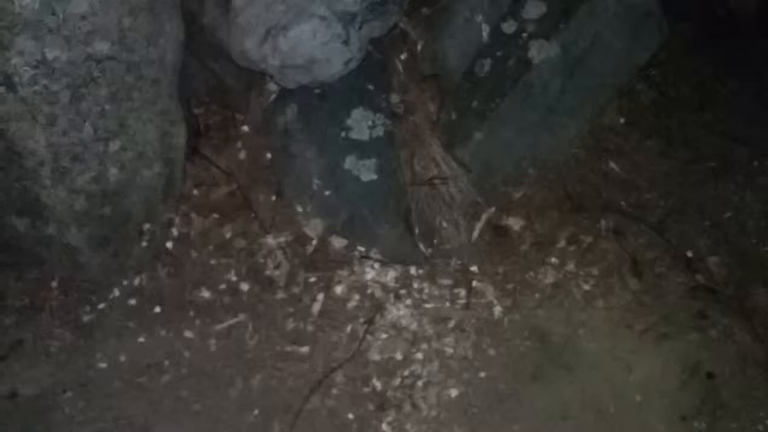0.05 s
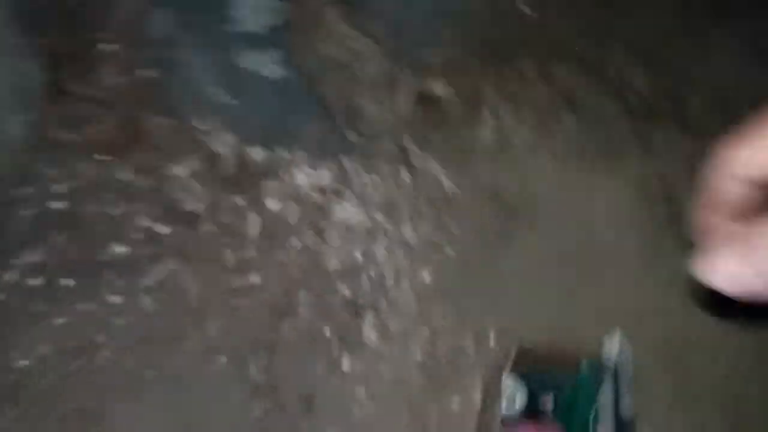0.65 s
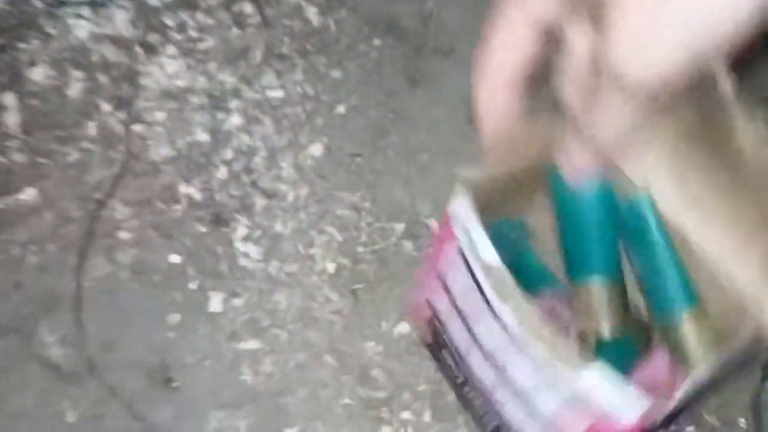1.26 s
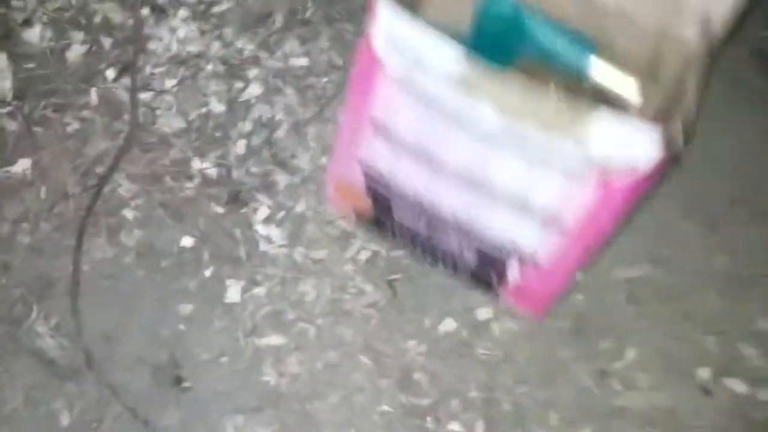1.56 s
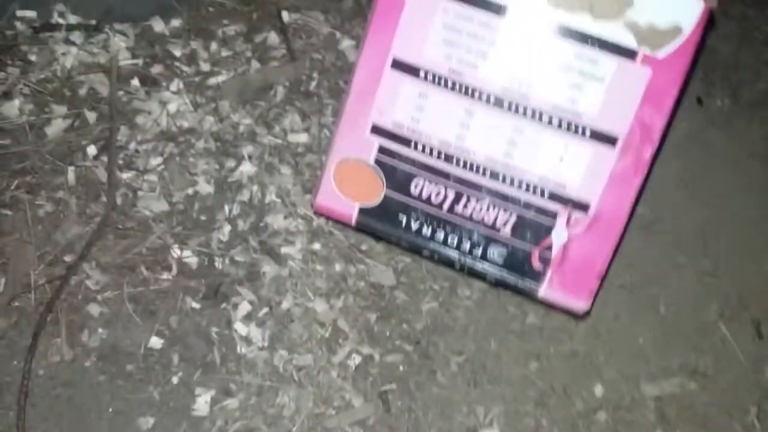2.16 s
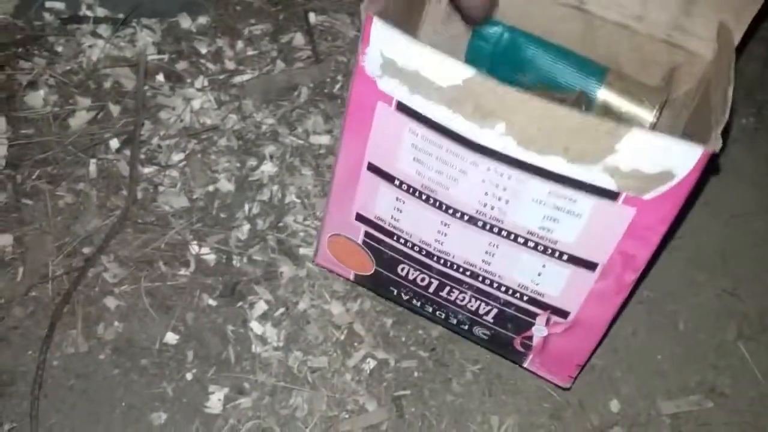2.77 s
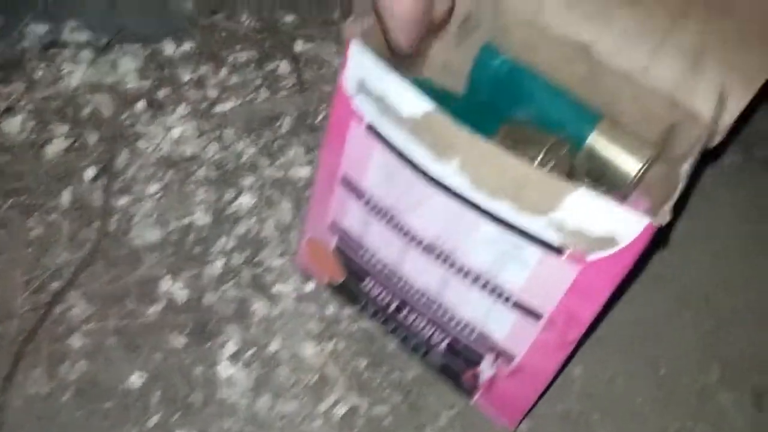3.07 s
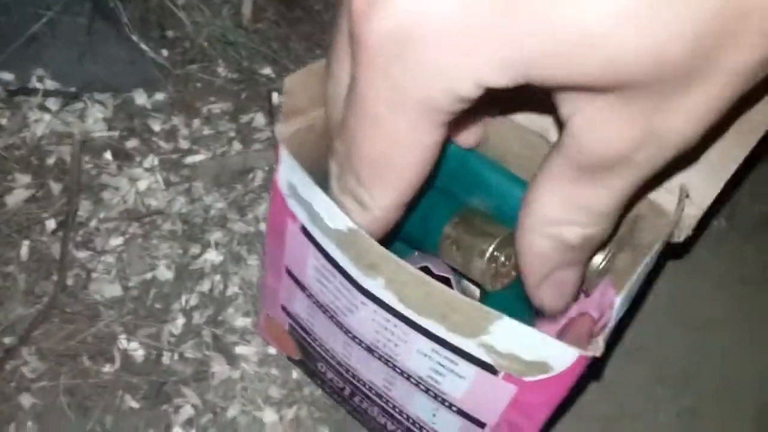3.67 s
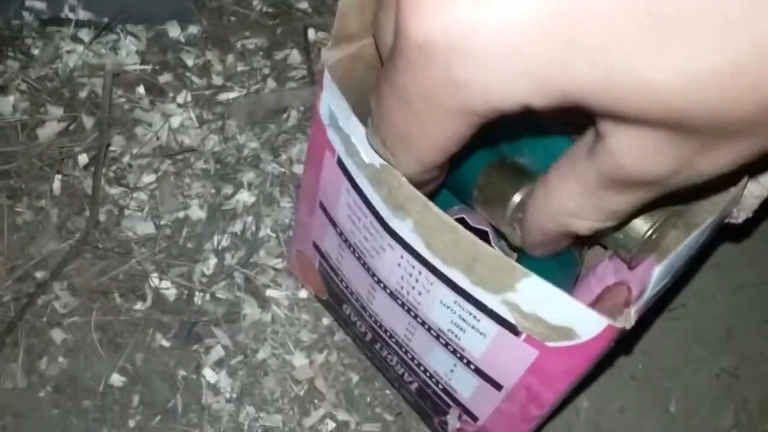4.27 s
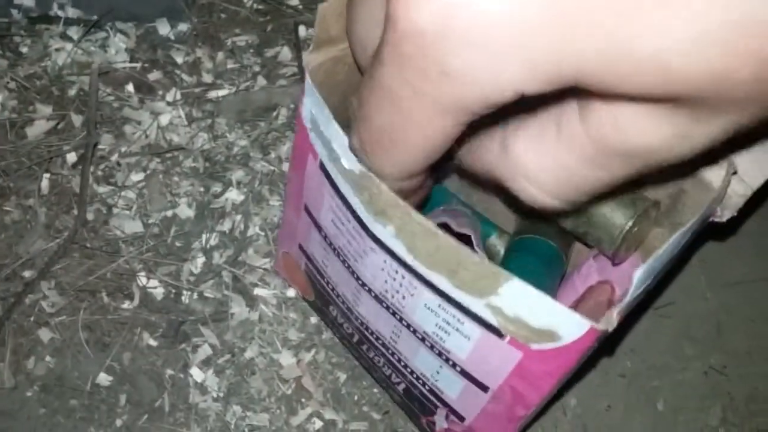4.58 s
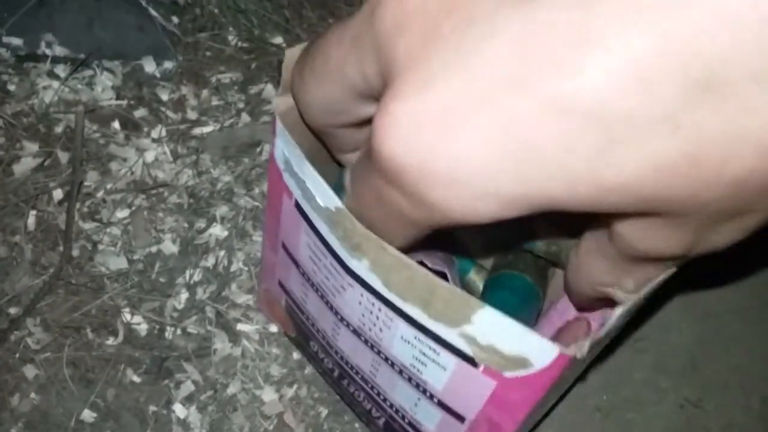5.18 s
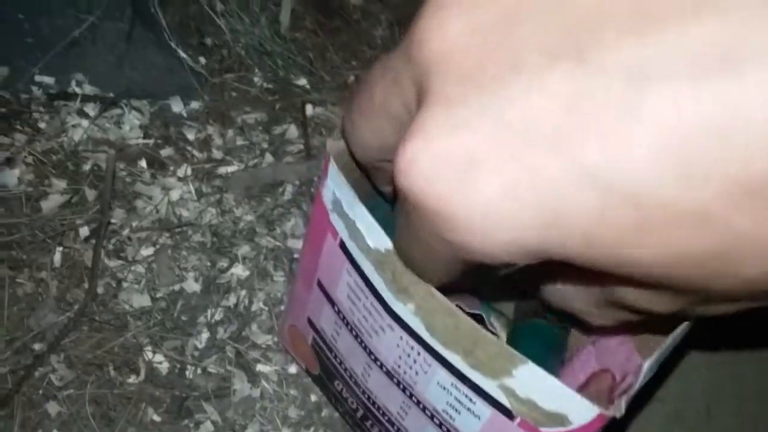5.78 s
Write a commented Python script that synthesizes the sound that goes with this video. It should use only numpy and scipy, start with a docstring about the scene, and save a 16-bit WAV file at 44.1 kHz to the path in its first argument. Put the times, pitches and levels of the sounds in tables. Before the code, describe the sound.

A cardboard box scrapes across dry ground, then fingers dig through the shotgun shells inside with scattered clicks, soft thuds and rubs.

```python
"""Rummaging in a box of shells

A hand drags a small cardboard box of shotgun shells over dry ground and digs through it, outdoors
on a still night. Loaded plastic hulls clack together, their brass heads tick, the box thuds under them.
Between the blows, hulls and fingers scrape the cardboard. A faint hiss and low air lie underneath."""
import sys
import numpy as np
from scipy import signal
from scipy.fft import rfft, irfft, next_fast_len
from scipy.io import wavfile
from scipy.ndimage import uniform_filter1d

SR = 44100
rng = np.random.default_rng(int(sys.argv[2]) if len(sys.argv) > 2 else 0)


def generate_wav(sig):
    """Save sig (samples, or channels by samples) to the path in sys.argv[1] as 16-bit PCM at SR."""
    pcm = np.round(np.clip(np.atleast_2d(sig).T, -1, 1) * 32767).astype(np.int16)
    wavfile.write(sys.argv[1], SR, pcm)


N = 266364
TIME = np.arange(N) / SR
AGE = TIME[:SR // 5]   # seconds into one blow

# Cue levels are faders: each layer adds its own trim.
# shell hits shell: start_s, level_db, pitch_hz, hardness_db, ring_share
# (hardness is high when brass meets brass; ring share scales the decay, below 1 for a wedged shell)
CLACKS = [(0.987, -73, 1500, 16, .5), (1.226, -54.5, 1080, 3.5, .35), (1.26, -47, 1680, 5, 0.96),
          (1.29, -41, 1550, -12, 0.64), (1.463, -37.5, 1100, 2, 0.83), (1.4925, -25, 1170, -7, 1),
          (1.505, -29, 1100, -15, 0.56), (1.519, -29, 940, -5.5, 0.88), (1.525, -25.5, 1250, -2.5, 0.31),
          (1.533, -26.5, 880, -8, 1), (1.573, -42.5, 1100, -4.5, .8), (1.588, -39.5, 1000, -10, 0.78),
          (1.88, -37.5, 800, -19, 0.53), (1.902, -56, 950, 3.5, 0.42), (2.447, -68, 1100, 5, 0.66),
          (2.996, -39.5, 1180, -11.5, 0.54), (3.109, -53, 1510, -1, 0.28), (3.118, -56, 1660, -8, 0.65),
          (3.514, -43.5, 1100, -17, 1), (3.956, -29.5, 1056, -7.5, 0.43), (4.15, -53, 1100, 1, .4),
          (4.155, -40.5, 1020, -12.5, 0.52), (4.506, -52, 1420, -8, 1), (4.5922, -40.5, 1670, -12, 0.6),
          (4.678, -55, 1160, -3.5, 0.83), (4.773, -45.5, 1720, -3, 0.97), (4.802, -50.5, 1850, -22, 0.53),
          (4.955, -49.5, 1250, -14, 0.37), (5.5175, -33, 1260, -6, 0.47), (5.6881, -18.5, 1340, -8, 0.95),
          (5.695, -21.5, 1300, -25, .95), (5.761, -42.5, 1110, -1, 0.65), (5.767, -34.5, 1100, -10, 0.64),
          (5.789, -37.5, 1120, -10.5, 1), (5.934, -42, 2000, -18, .5), (6.019, -48, 1440, -9.5, .95)]
# shell bumps the box wall: start_s, level_db, pitch_hz, hardness_db
THUDS = [(1.183, -57, 465, -9), (1.279, -40.5, 324, -0.5), (1.333, -33, 586, -5), (1.469, -29, 487, -21),
         (1.505, -37, 330, -12), (1.526, -28, 276, -13.5), (1.88, -37, 760, -11.5), (2.039, -53, 310, -17),
         (2.079, -60.5, 350, -13), (2.757, -57.5, 280, -7), (2.884, -51.5, 268, -22),
         (2.952, -32.5, 320, -16.5), (3.047, -56.5, 650, -4), (3.118, -52.5, 310, -11),
         (3.514, -40, 430, -19), (3.53, -46.5, 347, -16), (3.835, -58.5, 380, -8),
         (3.884, -48.5, 333, -5.5), (3.955, -41, 600, -16), (4.094, -57, 410, -7), (4.556, -56, 430, -6.5),
         (4.593, -47.5, 440, -12), (4.607, -46.5, 435, -9), (4.955, -47, 450, -15),
         (4.987, -51.5, 270, -3.5), (5.77, -41, 610, -18), (5.96, -53, 565, -9)]
# hulls and fingers rub the cardboard: middle_s, level_db, grit_offset_db, half_length_s
RUBS = [(1.275, -54, -7, 0.023), (1.409, -46.5, 6, 0.021), (1.578, -49, -2, 0.019), (1.681, -53, -1, 0.027),
        (1.874, -52.5, -6, 0.032), (2.894, -66, 4, 0.017), (2.969, -48, -7.5, 0.017), (3, -52, -6.5, 0.036),
        (3.396, -62.5, 3.5, 0.0074), (3.513, -54.5, -5.5, 0.041), (3.707, -62, -1.5, 0.024),
        (3.924, -56.5, -5.5, 0.056), (3.967, -54, 1, 0.014), (4.501, -64, -3.5, 0.022),
        (4.703, -57, -5, 0.013), (4.774, -56, 4, 0.027), (4.993, -62, 2, 0.025), (5.4, -66.5, -5, 0.071),
        (5.487, -59.5, -12, 0.016), (6.024, -62.5, 0.5, 0.041)]
# effort of pulling the box over the ground: time_s, level_db
DRAG_CURVE = [(1.2, -76), (1.27, -55), (1.36, -56), (1.44, -45), (1.56, -49), (1.71, -54.5), (1.79, -60),
              (1.95, -68.5)]
# the hand stirs the shells: time_s, chafe_db, rasp_db
STIR_CURVE = [(3.3, -82, -86), (3.65, -71, -83), (4.0, -80.5, -73), (4.35, -70, -82), (5.1, -78, -93),
              (5.42, -64, -76), (6.04, -65, -93)]
# plastic squeaks on plastic: middle_s, level_db, pitch_hz, half_length_s
SQUEAKS = [(1.974, -54.5, 2920, .002), (3.386, -49.5, 14400, .005), (5.567, -57, 13100, .0026)]
# rise and fall of the hiss: time_s, level_db
HISS_CURVE = [(0.4, -70.5), (0.86, -61), (1.0, -67), (1.08, -73.5), (3.1, -76), (4.0, -74), (6.04, -72.5)]

# modes of a loaded shell among its neighbours: pitch_hz, level_db, t60_s
SHELL_MODES = [(878, -2.5, 0.052), (965, 0, 0.04), (1080, 2, 0.073), (1193, -3.5, 0.06),
               (1439, -3.5, 0.073), (1528, 0, 0.038), (1681, -4, 0.052), (1757, -3.5, 0.05),
               (1911, -4, 0.058)]
# higher modes of the hull and its brass head: pitch_hz, level_db, t60_s
BRASS_MODES = [(2239, -2, 0.038), (2523, -0.5, 0.044), (3077, -2.5, 0.061), (3116, -6, 0.056),
               (3423, -11, 0.061), (3510, -18, 0.022), (4030, 0.5, 0.053), (4640, -6, 0.03)]
# modes of the cardboard box: pitch_hz, level_db, t60_s
BOX_MODES = [(226, -14.5, 0.25), (246.7, -1, 0.094), (312.4, -1, 0.087), (338, -3.5, 0.084),
             (411.6, -9.5, 0.067), (477.7, -9.5, 0.096), (565, -7.5, 0.065), (653, -1, 0.052)]

# bright tick of a blow: frequency_hz, level_db
TICK_EQ = [(2500, -14), (4200, 2.5), (5800, -1), (8500, -6.5), (11500, -6), (16000, -18.5)]
# dull body of rubbed cardboard: frequency_hz, level_db
RUB_EQ = [(59, -41), (100, -7.5), (161, -6), (235, -7.5), (328, -5), (472, -4), (698, -4.5), (784, -17),
          (906, -9), (1420, -13), (1570, -7), (2390, -18), (3200, -22.5), (4160, -51), (7040, -120)]
# rasp of its fibres: frequency_hz, level_db
GRIT_EQ = [(1470, -1), (2500, -4.5), (3210, -4.5), (4580, -2.5), (7420, -10.5), (9510, -8), (16000, -15)]
# low night air: frequency_hz, level_db
AIR_EQ = [(25, -16), (45, -3.5), (100, 0), (300, -1.5), (600, -7), (2500, -15.5)]
# smooth hiss: frequency_hz, level_db
HISS_EQ = [(1900, -8.5), (2400, -11), (3200, -10.5), (4400, -6), (6000, -10.5), (12000, -9.5),
           (16000, -11.5)]


def knocks():
    """Each glancing blow rings shell, box and brass, with a tick on top and a short skid in and out."""
    hits, skid_rub, skid_grit = np.zeros((3, N))
    bright = coloured(noise(), TICK_EQ)
    middle_s = AGE[-1] / 2
    skid = swell(middle_s + 0.0027, 0.0075)[:len(AGE)]   # peaks just after the hit
    blows = [clack(*row) for row in CLACKS] + [thud(*row) for row in THUDS]
    for k, (start_s, shell_db, shell_hz, box_db, box_hz, brass_db, share, softness) in enumerate(blows):
        pinch = np.clip(1 - share, 0, 1)   # wedged shells ring shorter and off pitch
        shell = from_db(shell_db - 3) * ring(
            SHELL_MODES, share, shell_hz, focus_db=21, contact_s=0.00064 * softness, detune=.05 * pinch)
        box = from_db(box_db - 4.5) * ring(
            BOX_MODES, share, box_hz, focus_db=23.5, contact_s=0.0009 * softness, detune=.08 * pinch)
        brass = from_db(brass_db - 6) * ring(
            BRASS_MODES, share * 1.02, 3370, focus_db=-8, contact_s=0.00059 * softness, detune=.3 * pinch)
        fizz = np.roll(bright, k * len(AGE) // 2)[:len(AGE)]
        add(hits, start_s, shell + box + brass + from_db(brass_db - 7) * tick(fizz, share, softness))
        add(skid_rub, start_s - middle_s, from_db(box_db - 7) * skid)
        add(skid_grit, start_s - middle_s, from_db(brass_db - 11.5) * skid)
    return hits + friction(skid_rub, skid_grit)


def clack(start_s, level_db, pitch_hz, hardness_db, ring_share):
    """Shell on shell: the hull leads and the box carries a little of the blow."""
    typical_db, box_hz, softness = -38, 464, 1
    box_db = -48 + 0.63 * (level_db - typical_db)
    return start_s, level_db, pitch_hz, box_db, box_hz, level_db + hardness_db, ring_share, softness


def thud(start_s, level_db, pitch_hz, hardness_db):
    """Shell on cardboard: the box leads and jolts the shells, more so on a hard hit."""
    shell_hz, ring_share, softness = 1090, 0.66, 1.56   # cardboard gives, so contact lasts longer
    shell_db = level_db - 2.5 + 0.46 * hardness_db
    return start_s, shell_db, shell_hz, level_db, pitch_hz, level_db + hardness_db, ring_share, softness


def ring(modes, ring_share, centre_hz, focus_db, contact_s, detune):
    """Struck modes swell during contact, then decay; each loses focus_db per octave from the centre."""
    hz, db, t60 = np.transpose(modes)[:, :, None]
    hz = hz * np.exp(detune * rng.uniform(-1.08, 1, hz.shape))
    db = db - focus_db * np.abs(np.log2(hz / centre_hz)) + rng.normal(0, 1.5, hz.shape)
    decay = from_db(-60 * AGE / (t60 * max(ring_share, .1)))
    phase = rng.uniform(0, 2 * np.pi, hz.shape)
    tone = np.sum(from_db(db) * decay * np.sin(2 * np.pi * hz * AGE + phase), axis=0)
    return unit_burst(tone * (1 - np.exp(-AGE / contact_s)))


def tick(fizz, ring_share, softness):
    """A sharp crack, then a short buzz as the shell settles on its neighbours."""
    attack = 1 - np.exp(-AGE / (0.00055 * softness))
    crack = np.exp(-AGE / 0.0012)
    buzz = from_db(-15.5) * np.exp(-AGE / (.012 * max(ring_share, .1)))
    return unit_burst(attack * (crack + buzz) * fizz)


def rubs():
    """Shells pushed past each other and the box wall scrape in short strokes and sing along."""
    card, grit = sum(from_db([db, db + grit_db])[:, None] * swell(middle_s, half_s)
                     for middle_s, db, grit_db, half_s in RUBS)
    singing = from_db(-4.5) * card * grazes(SHELL_MODES, per_s=980, spread_db=2.5, ring_share=0.46)
    return singing + friction(from_db(-0.5) * card, from_db(-0.05) * grit)


def drag():
    """The box scrapes across the dirt, and the shells in it jiggle."""
    pull, = gains(DRAG_CURVE)
    jiggle = from_db(-7.5) * pull * grazes(SHELL_MODES, per_s=280, spread_db=0, ring_share=0.5)
    jingle = from_db(-15.5) * pull * grazes(BRASS_MODES, per_s=1800, spread_db=7, ring_share=1.6)
    return friction(from_db(-3.5) * pull, from_db(-5) * pull) + jiggle + jingle


def stir():
    """Hull slides on hull: a soft chafe in fits and starts, a thin rasp and faint nudges."""
    low, high = gains(STIR_CURVE)
    fits = unit_rms(from_db(4 * wander(per_s=25)))
    chafe = grazes(SHELL_MODES[3:7], per_s=1800, spread_db=4, ring_share=.45)
    rasp = grazes(BRASS_MODES[-1:], per_s=6000, spread_db=4, ring_share=.1)
    nudges = grazes(BOX_MODES + SHELL_MODES, per_s=90, spread_db=1.5, ring_share=.6)
    return low * (from_db(-5) * fits * chafe + from_db(-7.5) * nudges) + from_db(1.5) * high * rasp


def squeaks():
    """Plastic sticks and slips on plastic: quick flicks of narrow-band noise."""
    out = np.zeros(N)
    for middle_s, db, hz, half_s in SQUEAKS:
        thin = signal.lfilter(*signal.iirpeak(hz, Q=5, fs=SR), noise())
        out += from_db(db) * swell(middle_s, half_s) * unit_rms(thin)
    return out


def friction(rub_gain, grit_gain):
    """Coarse slips shake the cardboard; finer ones rasp on its fibres."""
    rub = coloured(slips(per_s=3000, spread_db=3.5), RUB_EQ)
    grit = coloured(slips(per_s=9000, spread_db=0.5), GRIT_EQ)
    return rub_gain * rub + grit_gain * grit


def grazes(modes, per_s, spread_db, ring_share):
    """Light sliding contacts keep a set of modes ringing; rms 1."""
    clicks, out = slips(per_s, spread_db) + 1e-18, 0
    for k, (hz, db, t60) in enumerate(modes):
        radius = from_db(-60 / (t60 * max(ring_share, .1) * SR))
        poles = [1, -2 * radius * np.cos(2 * np.pi * hz / SR), radius ** 2]
        out = out + (-1) ** k * from_db(db) * signal.lfilter([1, 0, -1], poles, clicks)
    return unit_rms(out)


def slips(per_s, spread_db):
    """Tiny clicks of uneven strength that surge as the surfaces catch and let go."""
    sizes = from_db(spread_db * np.minimum(rng.exponential(1, N), 4))
    catch = from_db(2.5 * wander(per_s=160))
    return (rng.random(N) < per_s / SR) * sizes * catch * rng.choice([-1, 1], N)


def night_air():
    """A bed of smooth hiss fades in, with low air that gently follows its swells."""
    hiss, = gains(HISS_CURVE)
    hiss_rest_db, fade_start_s, fade_s = -75, .41, .25
    air = from_db(-72.5) * (hiss / from_db(hiss_rest_db)) ** 0.22
    fade = np.clip((TIME - fade_start_s) / fade_s, 0, 1)
    return fade * (air * coloured(noise(), AIR_EQ) + hiss * coloured(noise(), HISS_EQ))


def coloured(x, eq):
    """Shape a signal with an EQ curve that rolls off beyond its ends; rms 1."""
    hz, db = np.transpose(eq)
    size = next_fast_len(N)
    bins_hz = np.maximum(np.fft.rfftfreq(size, 1 / SR), 1)
    skirts = np.minimum(1, np.minimum(bins_hz / hz[0], hz[-1] / bins_hz)) ** 4
    curve = from_db(np.interp(np.log(bins_hz), np.log(hz), db))
    return unit_rms(irfft(rfft(x, size) * skirts * curve, size)[:N])


def swell(middle_s, half_length_s):
    """Envelope of a stroke that grows to its middle and dies away."""
    return 1 / np.cosh(np.minimum(np.abs(TIME - middle_s) * 2 / half_length_s, 30))


def gains(curve):
    """Each dB column of a curve as a gain over time, silent beyond its ends."""
    time_s, *columns = np.transpose(curve)
    return [from_db(np.interp(TIME, time_s, db, left=-200, right=-200)) for db in columns]


def wander(per_s):
    """Random drift that changes about per_s times a second; rms 1."""
    return unit_rms(uniform_filter1d(noise(), size=SR // per_s))


def noise():
    """White noise."""
    return rng.standard_normal(N)


def add(track, start_s, sound):
    """Mix a sound into the track at its cue."""
    start = int(start_s * SR)
    track[start:start + len(sound)] += sound[:max(N - start, 0)]


def from_db(db):
    """Decibels to gain."""
    return 10 ** (np.asarray(db) / 20)


def unit_rms(x):
    """Scale to a mean power of 1."""
    return x / np.sqrt(np.mean(x ** 2) + 1e-20)


def unit_burst(x):
    """Scale so that the loudest few milliseconds have a power of 1."""
    return x / np.sqrt(uniform_filter1d(x ** 2, 256, mode="constant").max() + 1e-20)


def scene():
    """Everything is close and central; ground and rocks return a faint, short scatter."""
    near = knocks() + rubs() + drag() + stir() + squeaks()
    # a low cut keeps the knocks and scrapes free of rumble
    near = signal.sosfilt(signal.butter(2, 105, "high", fs=SR, output="sos"), near)
    scatter = rng.standard_normal(len(AGE)) * np.exp(-AGE / 0.0089) * (AGE > .004)
    echo = signal.fftconvolve(near, scatter / np.linalg.norm(scatter))[:N]
    mono = near + from_db(-21) * echo + night_air()
    return np.array([mono, mono])


def record(dry):
    """A steep high cut takes off the very top."""
    return signal.sosfilt(signal.ellip(10, .2, 70, 15900, fs=SR, output="sos"), dry)


dry = scene()
out = record(dry)
generate_wav(out)
```